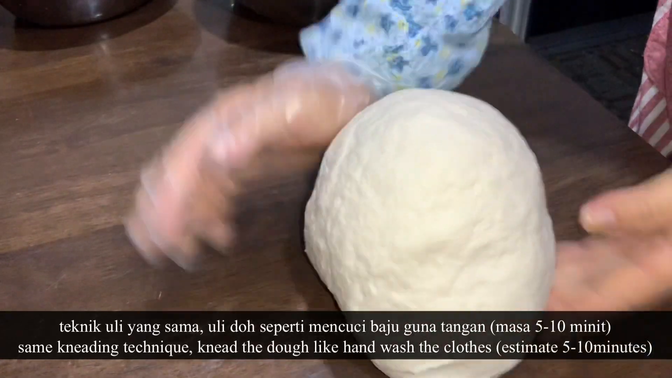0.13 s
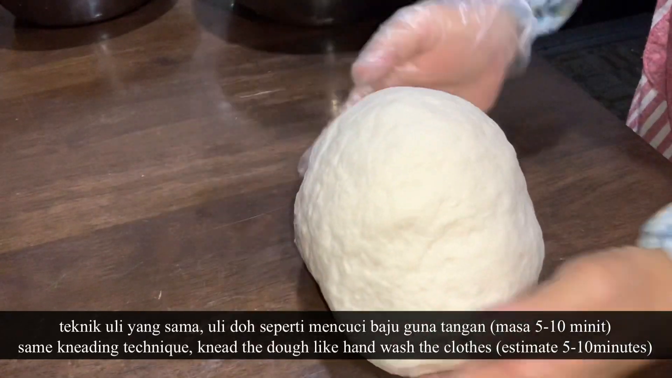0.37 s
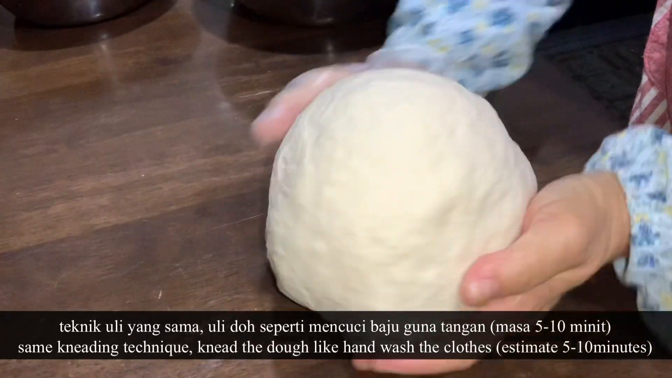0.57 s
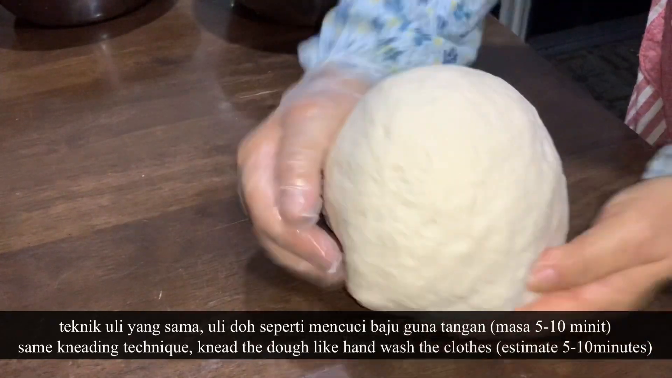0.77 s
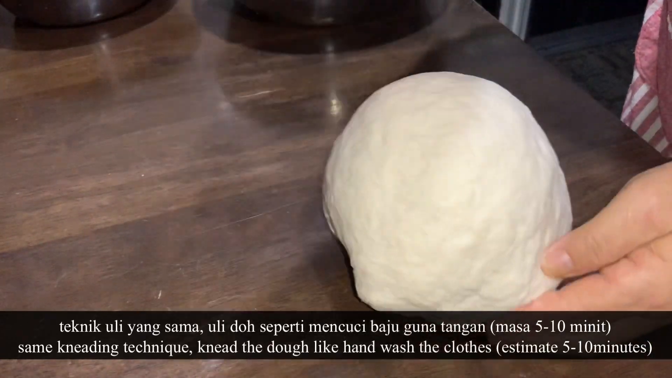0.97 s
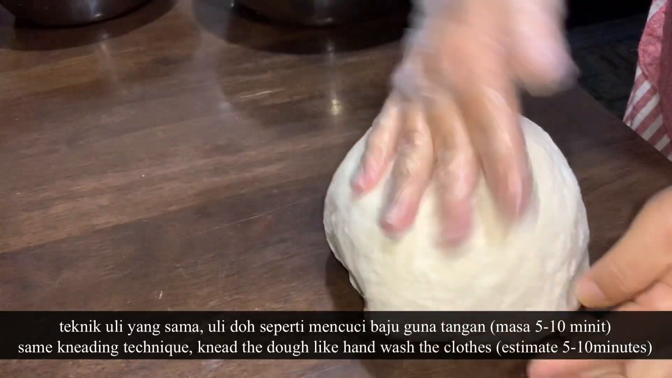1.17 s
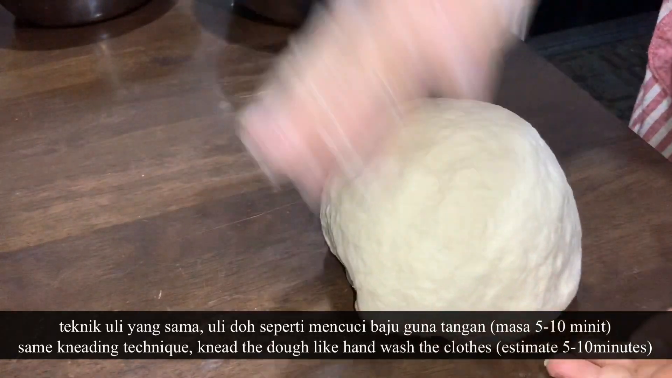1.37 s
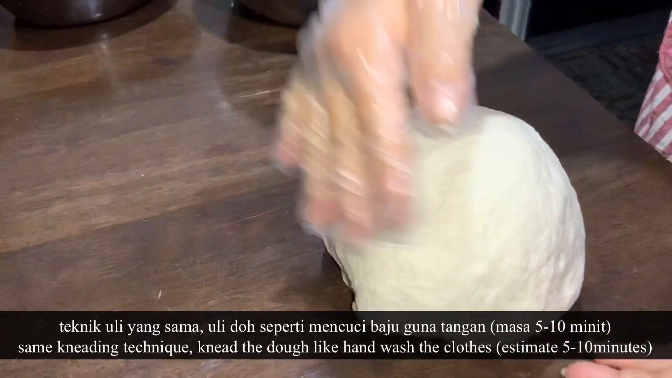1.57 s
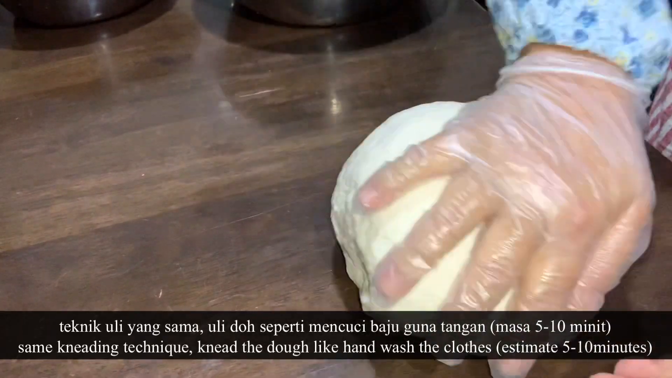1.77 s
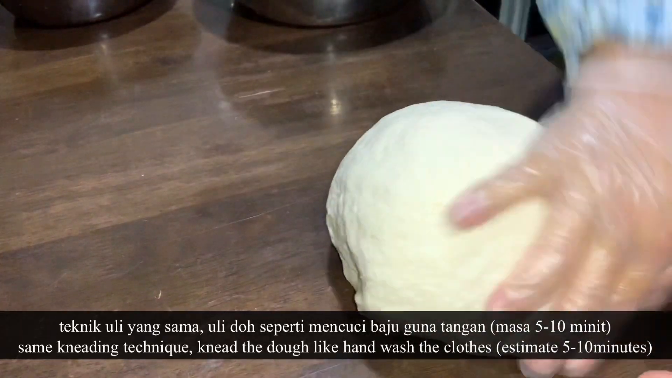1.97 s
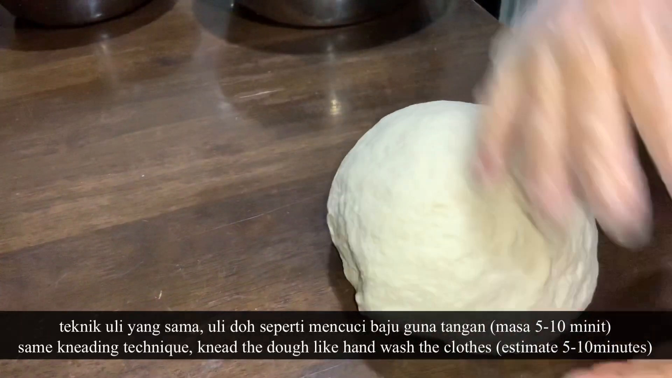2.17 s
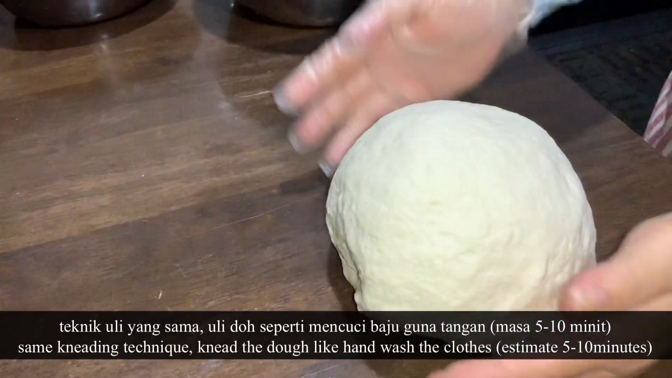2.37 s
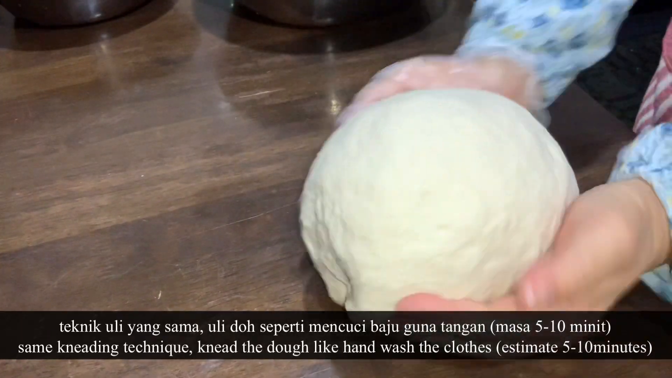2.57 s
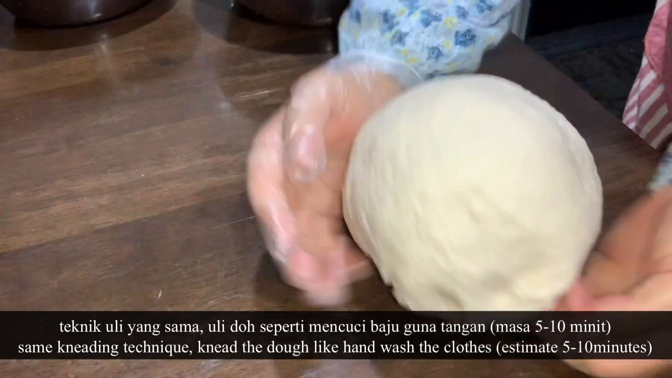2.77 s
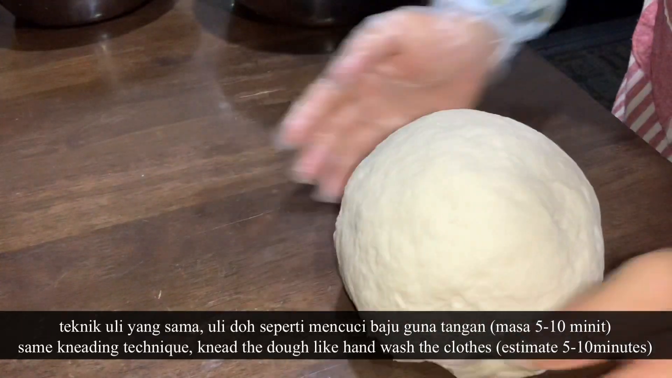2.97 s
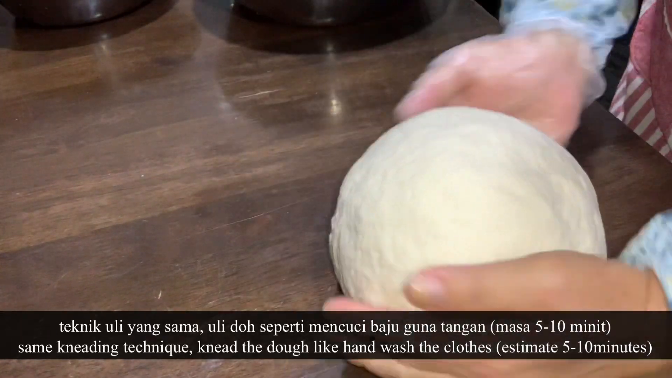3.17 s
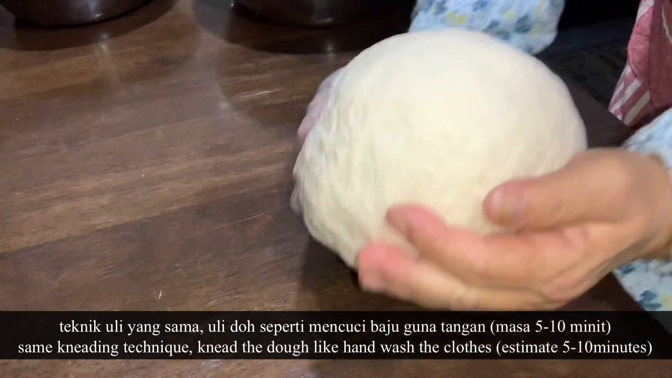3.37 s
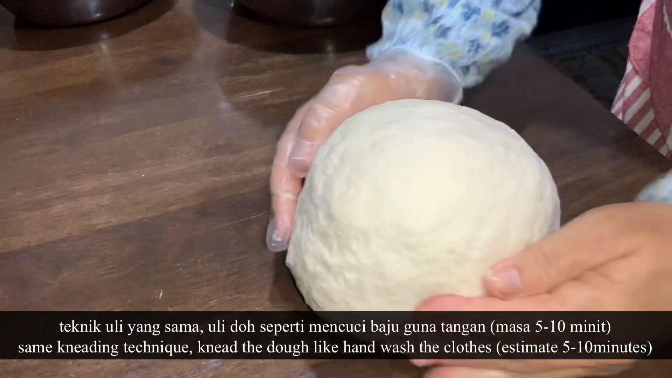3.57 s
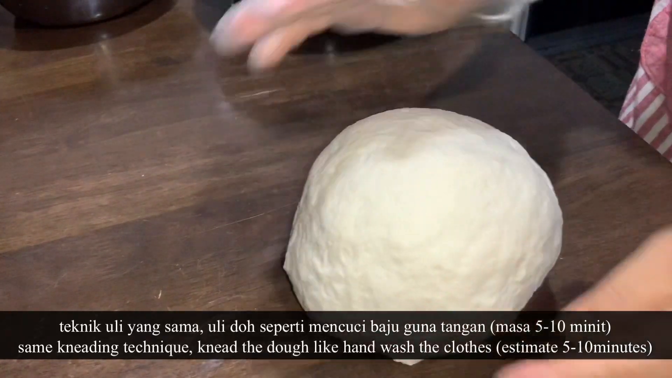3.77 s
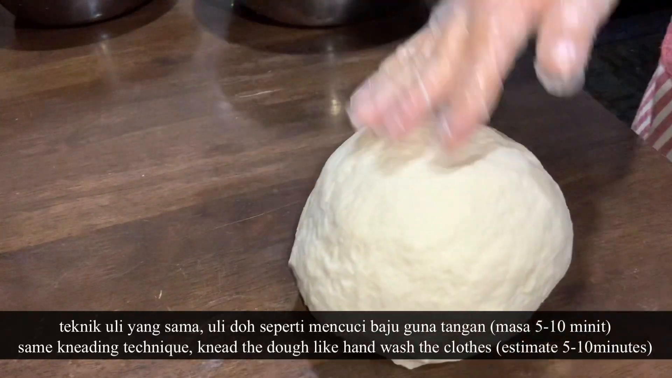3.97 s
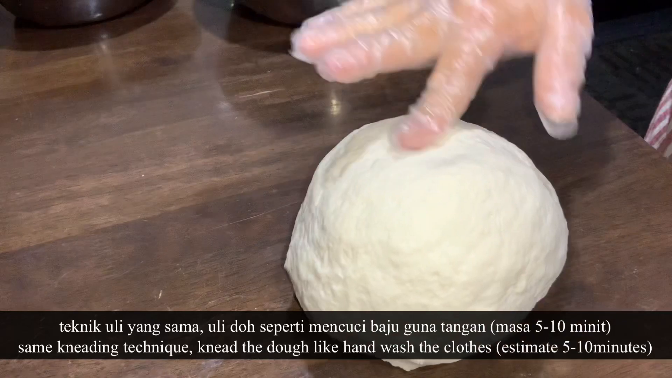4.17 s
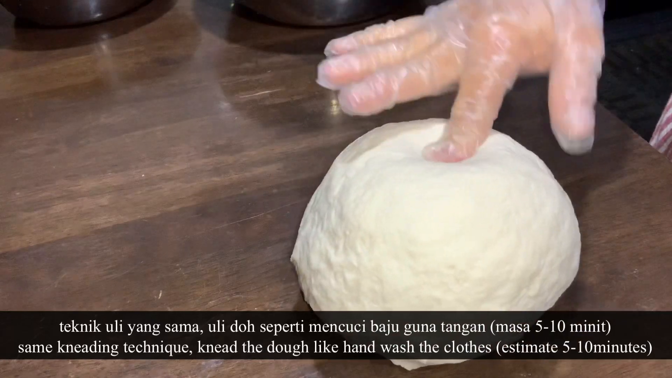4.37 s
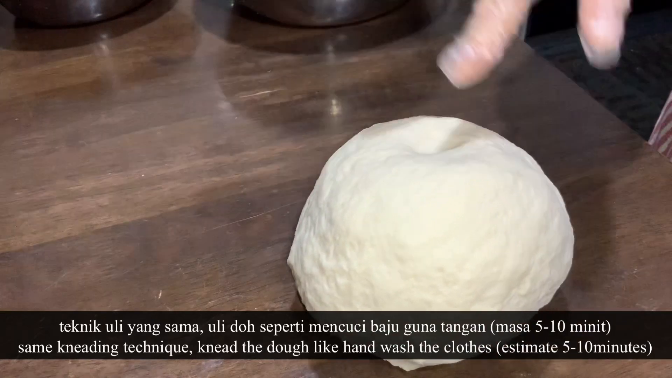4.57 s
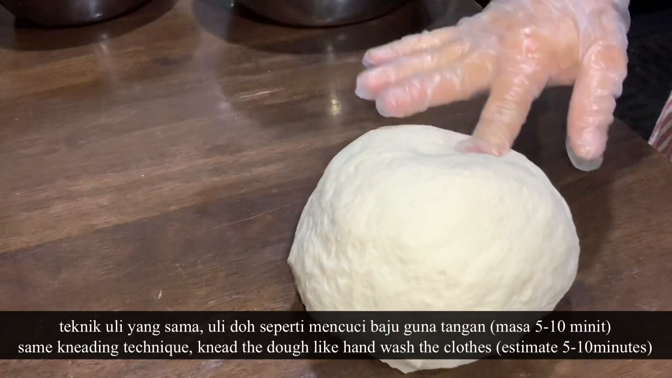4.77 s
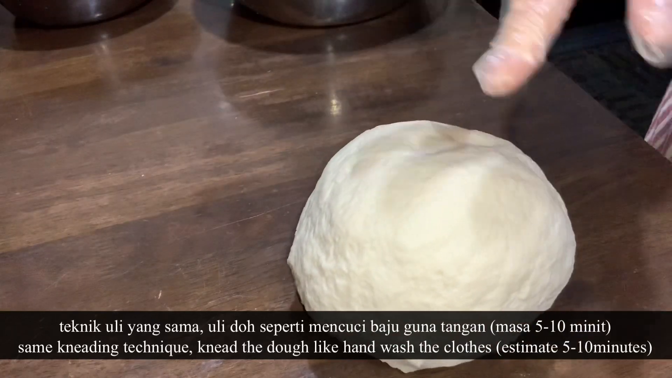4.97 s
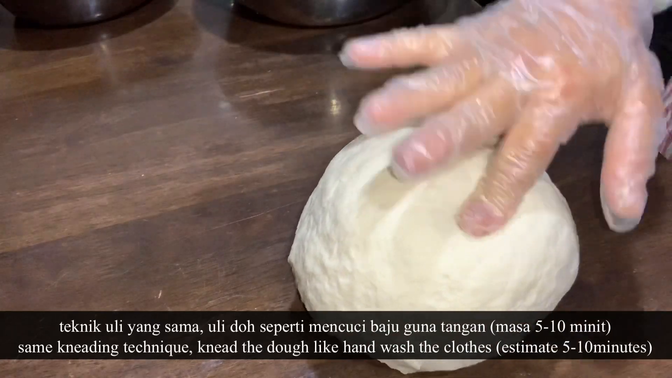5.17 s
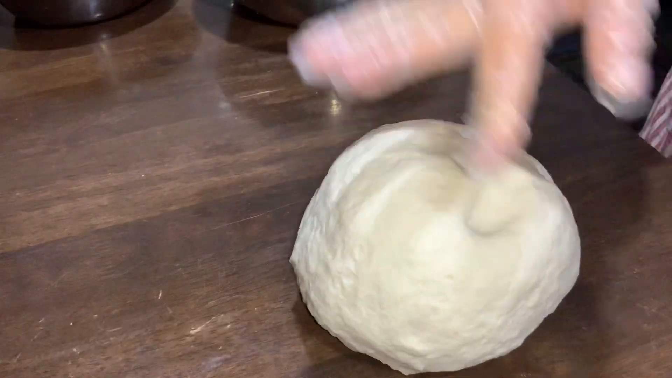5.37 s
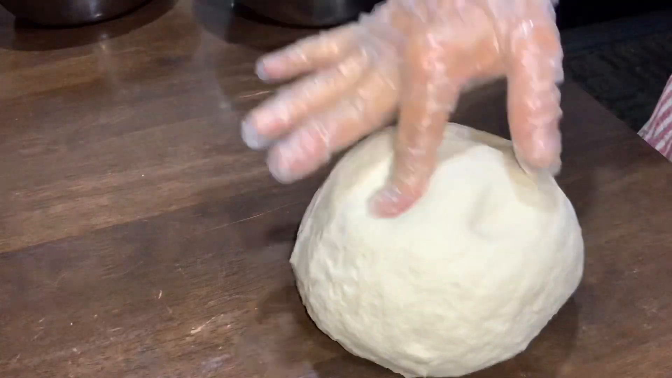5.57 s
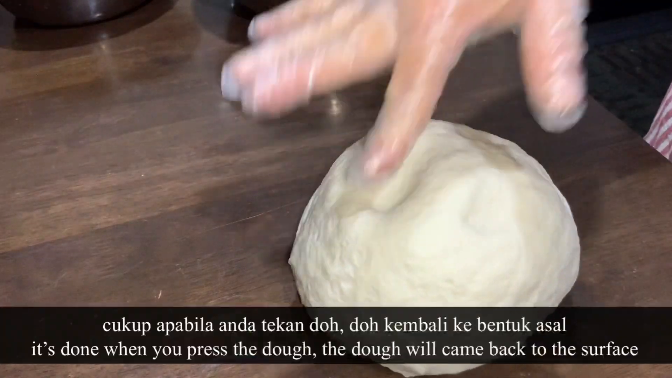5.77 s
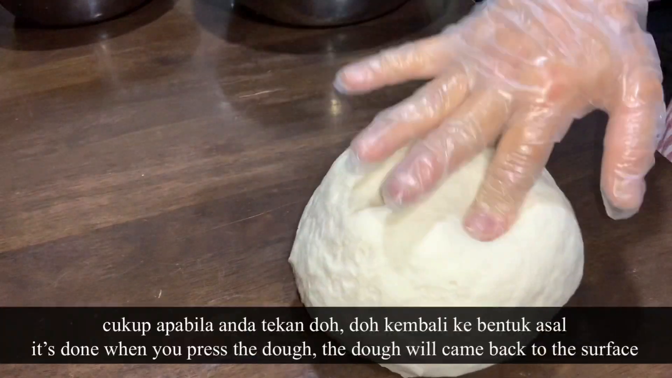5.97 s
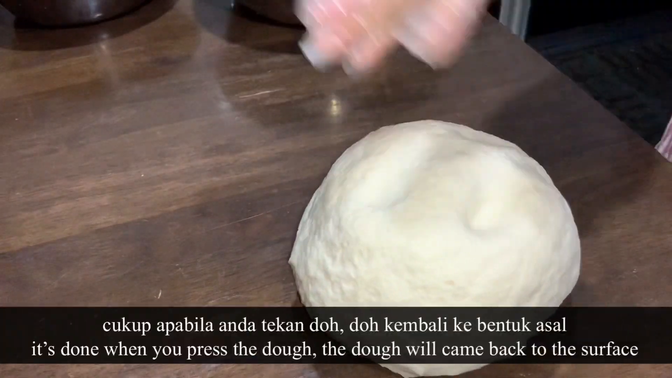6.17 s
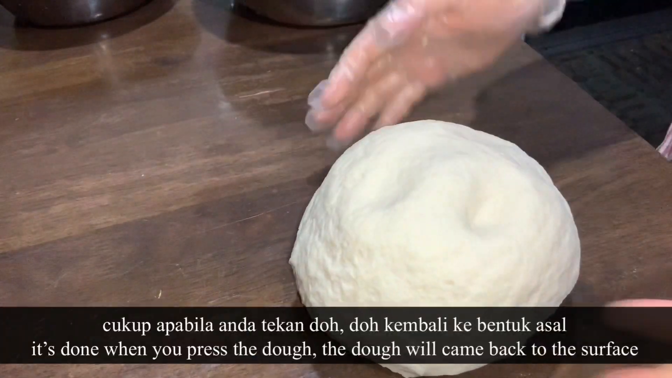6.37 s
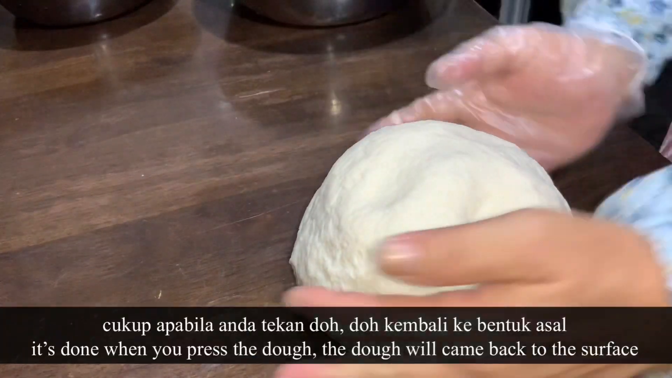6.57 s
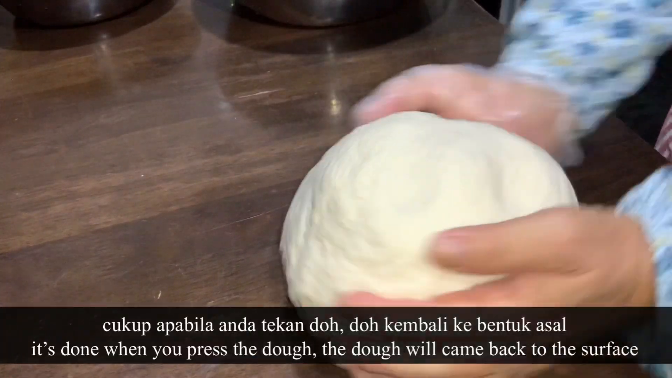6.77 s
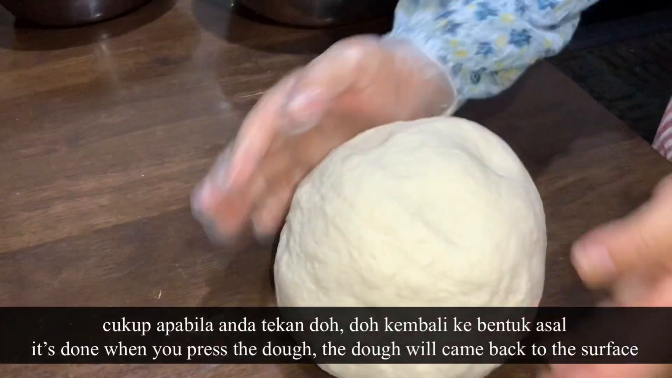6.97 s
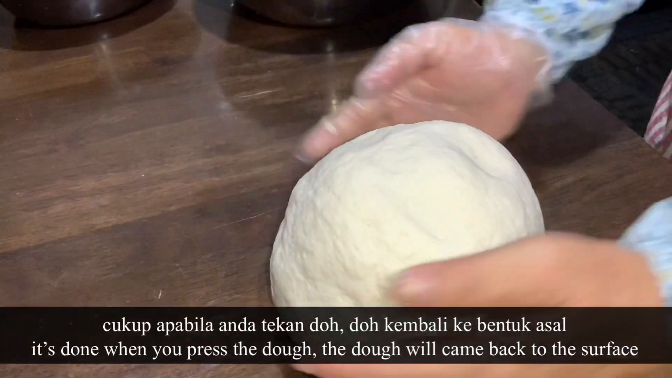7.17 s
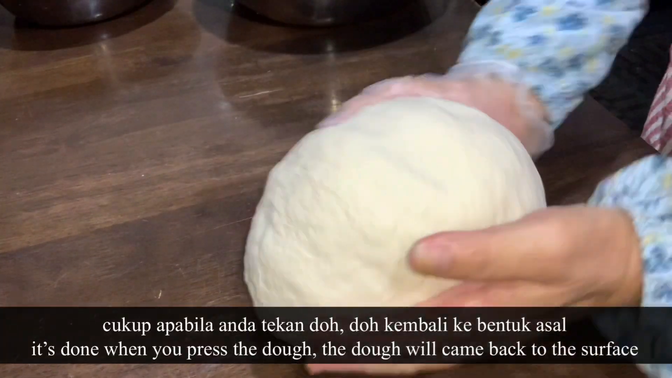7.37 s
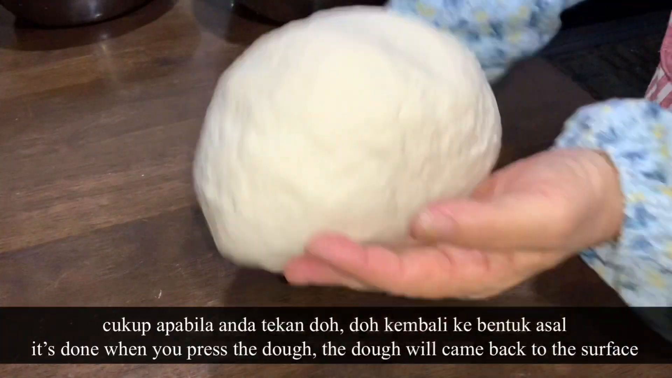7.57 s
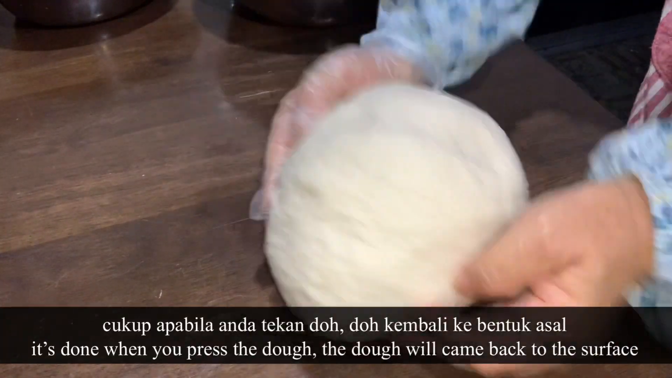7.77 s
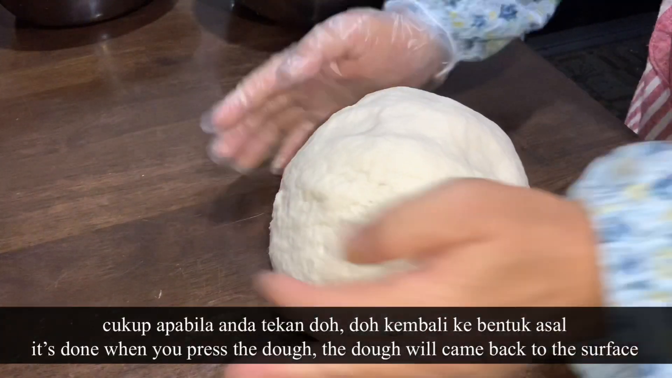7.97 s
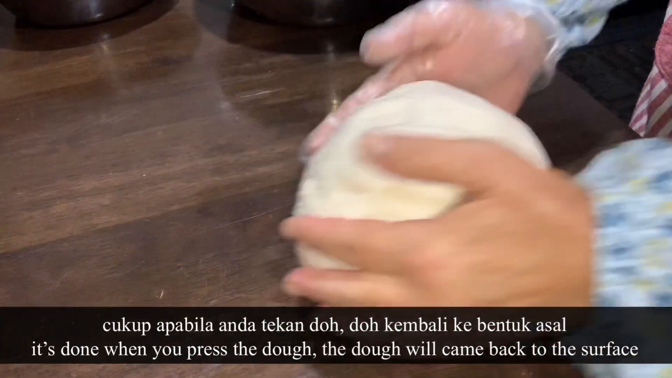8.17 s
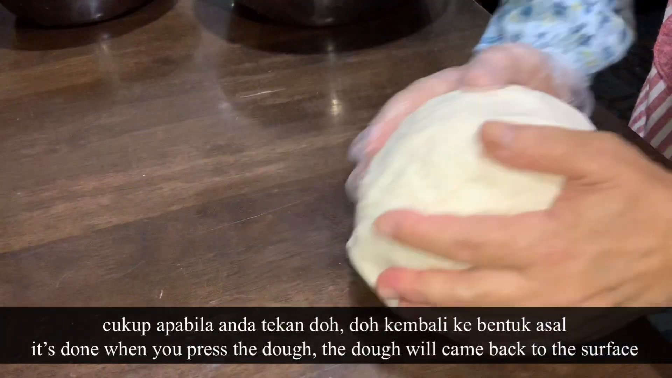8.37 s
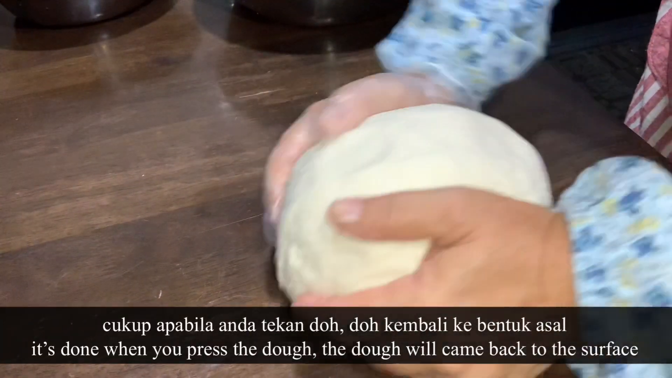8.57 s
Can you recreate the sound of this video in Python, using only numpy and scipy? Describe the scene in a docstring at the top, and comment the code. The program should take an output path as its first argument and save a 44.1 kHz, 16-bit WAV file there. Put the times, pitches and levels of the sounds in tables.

```python
"""Kneading dough in plastic gloves

Hands in thin plastic gloves slap, turn, poke and drop a ball of dough on a wooden table.
Shaped noise makes the film rustle and snap and the trapped air spit; fading sine waves make pops and thumps.
Random echoes add a small kitchen, over a low household rumble with a faint late whine.
The microphones are close, so the hardest slaps clip."""
import sys
import numpy as np
from scipy import signal
from scipy.fft import rfft, irfft, next_fast_len
from scipy.io import wavfile
from scipy.ndimage import uniform_filter1d, map_coordinates

SR = 44100
rng = np.random.default_rng(int(sys.argv[2]) if len(sys.argv) > 2 else 0)


def log_audio(samples):
    """Write samples as a 16-bit WAV file to the path given in sys.argv[1]."""
    # one column per channel
    frames = np.atleast_2d(samples).T
    # limit to full scale, then quantise
    limited = np.clip(frames, -1, 1)
    pcm = np.round(limited * 32767).astype(np.int16)
    wavfile.write(sys.argv[1], SR, pcm)


N = 380141
T = np.arange(SR // 2) / SR  # time within one contact, in seconds


def amp(db):
    """Turn decibels into a gain."""
    return 10 ** (np.asarray(db) / 20)


def unit(x):
    """Scale x to an average (rms) level of 1."""
    return x / np.sqrt(np.mean(x ** 2) + 1e-20)


def along(points, hz):
    """Read a curve of (Hz, value) points, with frequency on a log axis."""
    f, v = np.transpose(points)
    return np.interp(np.log(hz + 1), np.log(f), v)


def filtered(x, response):
    """Shape x by a gain that depends on frequency."""
    n = x.shape[-1]
    m = next_fast_len(n + 8192)
    spectrum = rfft(x, m) * response(np.fft.rfftfreq(m, 1 / SR))
    return irfft(spectrum, m)[..., :n]


def noise(spectrum, shape):
    """Coloured noise of rms 1."""
    return unit(filtered(rng.standard_normal(shape), lambda hz: amp(along(spectrum, hz))))


def resonance(hz, centre, width):
    """Response of one damped resonance: strongest at its centre, weaker to either side."""
    return 1j * hz * width / (centre ** 2 - hz ** 2 + 1j * hz * width)


def wobble(rate):
    """A smooth random curve with this many random knots a second."""
    knots = rng.standard_normal(int(N * rate / SR) + 4)
    return map_coordinates(knots, [np.arange(N) * rate / SR])


def add(track, s, sound):
    """Mix a sound into the track from time s in seconds."""
    i = round(s * SR)
    first, last = np.clip([i, i + len(sound)], 0, N)
    track[first:last] += sound[first - i:last - i]


def ring(hz, t60, attack):
    """A sine with a soft start that fades by 60 dB in t60 seconds."""
    return np.sin(2 * np.pi * hz * T) * amp(-60 * T / t60) * (1 - np.exp(-T / attack))


def glide(x, speed):
    """Play x at a changing speed, so its pitch moves too."""
    return map_coordinates(x, [np.cumsum(speed)])


def burst(envelope, response):
    """Dense noise under an envelope, filling the response evenly."""
    hz = np.fft.rfftfreq(len(envelope), 1 / SR)
    # keep only the noise's random phases, so the response alone sets the colour
    phase = np.angle(rfft(envelope * rng.standard_normal(len(envelope))))
    sound = irfft(np.exp(1j * phase) * response(hz), len(envelope)) * envelope ** 0.52
    return unit(sound) * np.sqrt(np.mean(envelope ** 2))


def add_spit(track, s, db, ms, response, lead_share, lead_ms, crackle_db):
    """Air squeezed from a closing gap, centred on s: a quick rise and a slower, crackling fall."""
    t = T - T.mean()
    u = t / (ms / 1000)
    lead = np.exp(-abs(t) / (lead_ms / 1000))
    rise = (1 - lead_share) * np.exp(-(1.365 * abs(u)) ** 3) + lead_share * lead
    fall = (1 + u ** 2) ** -2
    bell = np.where(u < 0, rise, fall)
    flicker = unit(uniform_filter1d(rng.standard_normal(len(T)), size=50))
    crackle = unit(amp(crackle_db * flicker))
    add(track, s - T.mean(), amp(db) * burst(bell * crackle, response))


# Colour of the household background. Each row: frequency in Hz, level in dB per Hz.
BACKGROUND_COLOUR = [(25, -11), (60, -10), (118, -1), (170, -8.5), (260, -11.5), (450, -20), (900, -24.5),
                     (1500, -34.5), (3000, -42.5), (6000, -39.5), (10000, -48.5), (16000, -36)]


def room_tone():
    """A low, steady household rumble with a trace of hiss; a faint whine of narrow noise sets in near the end."""
    t = np.arange(N) / SR
    mid, side = noise(BACKGROUND_COLOUR, (2, N))
    # less difference between left and right in the bass
    side = filtered(side, lambda hz: amp(along([(120, -10.5), (250, -6), (600, -0.5)], hz)))
    rumble = np.array([mid + side, mid - side])
    whine = unit(filtered(rng.standard_normal((2, N)), lambda hz: resonance(hz, 1793.0, 119.9) ** 2))
    whine_fade = np.clip((t - 7.2) / 0.5, 0, 1)
    return amp(-48.5) * rumble + amp(-60.0) * whine * whine_fade


# Notes of the wooden tabletop. Each row: frequency in Hz, level in dB, time to fade by 60 dB in seconds.
TABLETOP_MODES = [(41.5, -9, 0.27), (82, -1.5, 0.13), (124.6, -3, 0.2), (173, -2.5, 0.25),
                  (211.6, -3, 0.28), (258, 0, 0.19), (354, -6, 0.14), (491, -5, 0.21)]


def tabletop():
    """The wood rings in several notes, with new strengths and slightly new pitches under each soft blow."""
    out = np.zeros(len(T))
    for hz, db, t60 in TABLETOP_MODES:
        strength = amp(db + rng.normal(0, 3)) * rng.choice([-1, 1])
        out += strength * ring(hz * (1 + rng.normal(0, 0.025)), t60, attack=0.0019)
    return out


# Dough lands on the wood or is patted. Each row: start in seconds, smack level in dB, smack pitch in Hz,
# time for the smack to fade by 60 dB in seconds, tabletop level in dB.
PATS = [(0.024, -35, 860, 0.079, -42.5), (0.5443, -29.5, 800, 0.053, -46.5), (0.637, -31, 950, 0.044, -47),
        (1.793, -23, 1150, 0.094, -54), (1.893, -22, 1720, 0.042, -49), (1.995, -19.5, 970, 0.11, -29.5),
        (2.233, -34.5, 610, 0.13, -57), (2.490, -24, 1270, 0.046, -51), (2.543, -27.5, 1100, 0.035, -53),
        (2.6242, -23, 1560, 0.021, -47), (2.7935, -22, 1550, 0.059, -40.5),
        (3.158, -32.5, 1400, 0.041, -44), (3.178, -27.5, 1700, 0.028, -47.5), (3.263, -36, 900, 0.075, -48),
        (3.4307, -14, 1120, 0.044, -26.5), (3.574, -35, 890, 0.13, -56), (4.752, -45, 820, 0.13, -61),
        (6.641, -30.5, 1030, 0.093, -65), (6.774, -25.5, 1300, 0.035, -56),
        (7.282, -29, 1700, 0.023, -50.5), (7.297, -34.5, 1038, 0.29, -65), (7.767, -21.5, 960, .1, -27.5),
        (8.175, -29, 1050, 0.11, -42)]
SMACK_SAG, SMACK_SAG_S = 0.3, 0.014  # the pitch sinks by this share as the contact spreads
SMACK_DULL_HZ = 420  # smacks as low as this lose all their top
TICK_ABOVE, TICK_DB, TICK_T60_S = 3, -1.5, 0.016  # first touch: pitch over the smack's, level before dulling


def pats():
    """Soft dough meets wood or hand: a crisp tick and a hollow smack that sinks in pitch; the lower, the duller."""
    out = np.zeros(N)
    sag = 1 - SMACK_SAG * (1 - np.exp(-T / SMACK_SAG_S))
    for s, db, centre, t60, wood_db in PATS:
        top_hz, tick_hz = centre ** 2 / SMACK_DULL_HZ, TICK_ABOVE * centre
        hollow = lambda hz: resonance(hz, centre, centre) / (1 + (hz / top_hz) ** 3)
        smack_envelope = amp(-60 * T / t60) * (1 - np.exp(-T / 0.001))
        smack = glide(burst(smack_envelope, hollow), sag)
        tick_envelope = amp(TICK_DB - 60 * T / TICK_T60_S)
        tick = burst(tick_envelope, lambda hz: resonance(hz, tick_hz, tick_hz))
        tick_dulling = min(top_hz / tick_hz, 1) ** 2
        add(out, s, amp(db) * (smack + tick_dulling * tick) + amp(wood_db) * tabletop())
    return out


def crinkle(spectrum, rate, share):
    """Friction noise of rms 1: a smooth rush with clumps of tiny slips, rate of them a second."""
    slips = (rng.random(N) < rate / SR) * rng.standard_normal(N) * amp(3.5 * wobble(120))
    drive = np.sqrt(share) * unit(slips) + np.sqrt(1 - share) * rng.standard_normal(N)
    return unit(filtered(drive, lambda hz: amp(along(spectrum, hz))))


# The hands stroke, cup and turn the ball. Each row: first touch in seconds, firmest squeeze in seconds
# (if later than letting go, the rub is cut off while still growing), letting go in seconds,
# film hiss level in dB before the skim, dough rub level in dB at the firmest squeeze.
TURNS = [(0.027, 0.078, .17, -38.5, -38), (0.303, 0.435, 0.53, -46.5, -47),
         (0.585, 0.753, 0.93, -44.5, -43.5), (2.401, 2.49, 2.8, -39, -45),
         (2.916, 3.234, 3.295, -42.5, -47), (3.34, 3.5, 3.71, -52, -44), (4.831, 4.885, 4.91, -45.5, -51.5),
         (5.529, 5.57, 5.8, -60.5, -65), (6.076, 6.176, 6.24, -63.5, -51.5), (6.337, 6.43, 6.5, -68, -55),
         (6.469, 6.71, 6.74, -45.5, -45.5), (6.716, 6.96, 6.85, -39.5, -39), (7.1, 7.3, 7.48, -40.5, -43),
         (7.695, 7.78, 7.9, -45, -43), (7.987, 8.138, 8.24, -43, -47), (8.378, 8.66, 8.48, -51.5, -41)]
# Colours of the film's hiss and the dough's rub. Each row: frequency in Hz, level in dB per Hz.
HISS_COLOUR = [(200, -29), (3000, -26), (7500, -14), (11000, -3.5), (13500, 0), (16000, -9.5)]
RUB_COLOUR = [(80, -4), (1000, -4), (2200, 0), (4500, -2.5), (7500, -6), (16000, -21.5)]
# the slide that follows every row of SLAPS, timed from its crack
SLIDE_START_S, SLIDE_PRESS_S, SLIDE_END_S, SLIDE_HISS_DB = 0.04, 0.12, 0.17, -41
SKIM_S, SKIM_DB = 0.092, 3  # the glove first skims in quickly and hisses more, most at this time
RUB_SWELL_DB = 17.5  # growth from a light touch to full pressure
SLEEVE_DB, SLEEVE_S = -13, 0.49  # a faint rustle goes with the hands' motion, spread over this time


def strokes():
    """Sliding hands: the film hisses from first touch, the dough's skin rubs louder as the pressure swells."""
    t = np.arange(N) / SR
    hiss, rub = np.zeros((2, N))
    slides = [(s + SLIDE_START_S, s + SLIDE_PRESS_S, s + SLIDE_END_S, SLIDE_HISS_DB, rub_db)
              for s, *_, rub_db in SLAPS]
    for start, squeeze, end, hiss_db, rub_db in TURNS + slides:
        since = t[:max(round((end - start) * SR), 2)]
        contact = np.clip(since / 0.0078, 0, 1) * np.clip((since[-1] - since) / 0.035, 0, 1)
        slack = np.interp(start + since, [start, squeeze, end], [1, 0, 1]) ** 2
        skim = since / SKIM_S * np.exp(1 - since / SKIM_S)
        add(hiss, start, amp(hiss_db + SKIM_DB * skim) * contact)
        add(rub, start, amp(rub_db - RUB_SWELL_DB * slack) * contact)
    hiss, rub = [level + amp(SLEEVE_DB) * uniform_filter1d(level, round(SLEEVE_S * SR))
                 for level in (hiss, rub)]
    grip = amp(3.13 * wobble(30) + wobble(120))  # the film catches and lets go
    film = hiss * crinkle(HISS_COLOUR, rate=450, share=0.64)
    skin = rub * crinkle(RUB_COLOUR, rate=330, share=0.7)
    return grip * (film + skin)


# The glove brushes hard over the dough. Each row: centre in seconds, level in dB, length in ms.
DABS = [(0.097, -20.5, 2.3), (0.7473, -25.5, 2), (0.78, -19.5, 13.3), (2.757, -21.5, 10), (4.66, -49, 3.54),
        (6.967, -26.5, 39), (7.774, -26.5, 26)]
# Colour of a brush. Each row: frequency in Hz, level in dB per Hz.
DAB_COLOUR = [(100, -13), (700, -9), (1400, -8.5), (3500, -5.5), (8000, -8.5), (13000, 1), (16000, -6)]
# A finger tests the dough. Each row: press in seconds, pull out in seconds, pull length in seconds,
# press level in dB, pull level in dB.
POKES = [(4.168, 4.43, 0.016, -40, -29.5), (5.0895, 5.325, 0.017, -38, -32.5),
         (5.519, 5.735, 0.0315, -38.5, -31), (5.9, 6.073, 0.0056, -32.5, -27.5)]
PRESS_MS = 4.7  # the fingertip lands with a tick
STRETCH_DB, STRETCH_MS = -13.5, 16.7  # hiss of the stretching film, level relative to the pull


def gloves():
    """Light dabs of the film: hard brushes, fingertip pokes and the stretch before a finger comes free."""
    out = np.zeros(N)
    presses = [(s, db, PRESS_MS) for s, _, _, db, _ in POKES]
    stretches = [(s, db + STRETCH_DB, STRETCH_MS) for _, s, _, _, db in POKES]
    colour = lambda hz: amp(along(DAB_COLOUR, hz))
    for s, db, ms in DABS + presses + stretches:
        add_spit(out, s, db, ms, colour, lead_share=0.55, lead_ms=2.1 * ms, crackle_db=3.0)
    return out


# The ball's weight settles on the table in one soft push. Each row: start in seconds, level in dB, pitch in Hz.
BUMPS = [(0.12, -29, 100), (0.362, -33.5, 99), (.641, -26, 84), (1.419, -21.5, 79), (1.732, -22.5, 77.5),
         (1.99, -19, 80), (3.166, -29.5, 87), (3.445, -24.5, 100), (7.77, -20, 80)]
BUMP_CYCLES = 0.66  # cycles until the push is strongest


def bumps():
    """The soft, heavy ball pushes the table through a cycle or two of a low sine."""
    out = np.zeros(N)
    for s, db, hz in BUMPS:
        u = T * hz / BUMP_CYCLES
        add(out, s, -amp(db) * np.sin(2 * np.pi * hz * T) * (u * np.exp(1 - u)) ** 2)
    return out


# The glove film snaps taut. Each row: start in seconds, level in dB before a 12 dB lift, pitch of its ping in Hz.
SNAPS = [(0.1937, -10.5, 14350), (0.327, -10, 13300), (3.3579, -12.5, 13850), (3.5043, -10.5, 13250)]
# Resonances of the taut film. Each row: frequency in Hz, width in Hz, level in dB.
FILM_RESONANCES = [(2560, 570, -14), (6890, 900, -6), (8800, 600, -8.5), (14900, 650, -8)]
PING_WIDTH_HZ, PING_DB = 480, 7  # the ping, louder than the other resonances


def snaps():
    """The film snaps taut and rings for a few milliseconds; its tension sets the ping."""
    out = np.zeros(N)
    envelope = amp(-60 * T / 0.012) * (1 - np.exp(-T / 0.0016))
    for s, db, ping_hz in SNAPS:
        resonances = FILM_RESONANCES + [(ping_hz, PING_WIDTH_HZ, PING_DB)]
        film = lambda hz: np.sqrt(sum(abs(amp(level) * resonance(hz, centre, width)) ** 2
                                      for centre, width, level in resonances))
        add(out, s, amp(db + 12.0) * burst(envelope, film))
    return out


# The palm hits the dough, or the dropped ball lands (3.43 s). Each row: centre of the crack in seconds,
# crack level in dB, crack length in ms, thump level in dB, thump pitch in Hz, tabletop level in dB,
# rub level in dB as the hand slides off.
SLAPS = [(1.0714, 3, 2.9, -0.5, 220, -29.5, -39.5), (1.4075, 1.5, 6.36, -18, 262, -25.5, -35.5),
         (1.7183, -1, 7.3, -4, 190, -27, -41), (1.983, -6.5, 9.5, -17.5, 333, -26, -42),
         (3.4321, -24, 4.7, -11, 178, -24.5, -66), (3.8526, -8, 3.1, -15, 202, -49, -49.5)]
# Colour of the crack. Each row: frequency in Hz, level in dB per Hz.
CRACK_COLOUR = [(100, -2.5), (600, -1.5), (1300, -6), (2300, -4), (8500, -6), (13000, 1.5), (16000, -1)]
GAP_HZ, GAP_FALL_PER_MS = 6640, 0.12  # closing air gap: a slower slap sounds lower
THUMP_SAG, THUMP_SAG_S = 1.1, 0.0025  # the thump starts higher by this share and sinks as the dough gives


def slaps():
    """Air spits through the gap under the palm or ball, then the dough thumps and pushes the table."""
    out = np.zeros(N)
    sag = 1 + THUMP_SAG * np.exp(-T / THUMP_SAG_S)
    for s, crack_db, ms, thump_db, thump_hz, wood_db, _ in SLAPS:
        gap_hz = GAP_HZ * np.exp(-GAP_FALL_PER_MS * ms)
        gap = lambda hz: amp(along(CRACK_COLOUR, hz)) * (1 + 1.4 * abs(resonance(hz, gap_hz, 0.36 * gap_hz)))
        add_spit(out, s, crack_db, ms, gap, lead_share=0.1, lead_ms=3.6, crackle_db=3.0)
        landed = s + ms / 2000  # half a crack length later
        thump = glide(ring(thump_hz, t60=0.034, attack=0.0022), sag)
        add(out, landed, -amp(thump_db) * thump + amp(wood_db) * tabletop())
    return out


# The glove drags over the dough in tiny slips. Each row: start in seconds, length in seconds, level in dB,
# pitch at the start in Hz, pitch at the end in Hz.
SCUFFS = [(1.503, 0.044, -33.5, 2225, 2143), (1.888, 0.055, -36, 2715, 1806),
          (6.93, 0.057, -36.5, 3170, 3264), (8.108, 0.026, -40, 2220, 2130)]
SLIPS_PER_S, SCUFF_WIDTH = 830, 0.11  # width as a share of the starting pitch
SCUFF_UPPER, SCUFF_UPPER_DB = 1.45, -7.5  # second resonance: pitch and level relative to the first


def scuffs():
    """Uneven slips ring two resonances of the film, which move as its tension changes."""
    out = np.zeros(N)
    for s, length, db, start_hz, end_hz in SCUFFS:
        u = np.clip(T / length, 0, 1)
        slips = (rng.random(len(T)) < SLIPS_PER_S / SR) * rng.standard_normal(len(T))
        width, upper_hz = SCUFF_WIDTH * start_hz, SCUFF_UPPER * start_hz
        film = lambda hz: resonance(hz, start_hz, width) - amp(SCUFF_UPPER_DB) * resonance(hz, upper_hz, width)
        drag = glide(unit(filtered(slips, film)), (end_hz / start_hz) ** u)
        add(out, s, amp(db) * np.sqrt(abs(np.sin(np.pi * u))) * drag)
    return out


PEEL_GAP_S, PEEL_TICK_MS = 0.0055, 2.65  # the finger comes free in a run of sharp snaps
PEEL_DULLING_DB = 1.32  # darker tilt reached over the whole pull, in dB per octave in the treble


def peels():
    """The fingertip unsticks in separate snaps, which darken as the gap opens."""
    out = np.zeros(N)
    for _, s, length, _, db in POKES:
        for since in np.arange(0, length, PEEL_GAP_S):
            tilt_db = PEEL_DULLING_DB * since / length
            colour = lambda hz: amp(along(DAB_COLOUR, hz) - tilt_db * np.log2(1 + hz / 1000))
            late, size_db = rng.normal(0, [PEEL_GAP_S / 10, 2])  # uneven timing and strength
            add_spit(out, s + since + late, db + size_db, PEEL_TICK_MS, colour,
                     lead_share=0.15, lead_ms=2 * PEEL_TICK_MS, crackle_db=2)
    return out


# Air pops out of a cupped hand or from under the ball.
# Each row: start in seconds, level in dB before an 8 dB lift, pitch in Hz.
POPS = [(6.544, -14.5, 337.5), (6.579, -26, 320), (6.737, -18.5, 333), (7.153, -31, 336), (7.768, -21, 335),
        (8.225, -31.5, 338), (8.317, -30.5, 328)]


def pops():
    """Air cupped between palm and dough rings briefly at one pitch, with a faint higher partner."""
    out = np.zeros(N)
    for s, db, hz in POPS:
        low = ring(hz, t60=0.038, attack=0.0057)
        high = ring(2.5 * hz, t60=0.056, attack=0.0027)
        add(out, s, amp(db + 8.0) * (low + 0.075 * high))
    return out


# Balance of the two microphones. Each row: frequency in Hz, level of left over right in dB.
LEFT_LEAN = [(150, 3.5), (1200, 3), (2000, -5), (4000, 0)]
PORT_LAG = 27  # samples by which the left microphone hears the treble later


def microphones(x):
    """The left port hears the treble later; the bass arrives in step and leans left, the upper middle leans right."""
    lag = lambda hz: PORT_LAG / SR * (1 - np.exp(-np.maximum(hz - 950, 0) / 500))
    late = lambda hz: np.exp(-2j * np.pi * hz * lag(hz))
    lean = lambda hz: amp(along(LEFT_LEAN, hz) / 2)
    left = filtered(x, lambda hz: late(hz) * lean(hz))
    right = filtered(x, lambda hz: 1 / lean(hz))
    return np.array([left, right])


# How long the kitchen echoes. Each row: frequency in Hz, time to fade by 60 dB in seconds.
KITCHEN_FADE = [(100, 0.32), (300, 0.65), (1200, 0.4), (5000, 0.42), (13000, 0.28)]


def room_tail():
    """A diffuse tail of fading noise, unrelated between the ports except in the bass."""
    hz, t, z = signal.stft(rng.standard_normal((2, SR // 2)), SR, nperseg=256)
    z[1] *= np.clip(hz / 700, 0.3, 1)[:, None]  # less left-right difference in the bass
    fade = amp(-60 * t / along(KITCHEN_FADE, hz)[:, None])
    mid, side = signal.istft(z * fade, SR, nperseg=256)[1]
    onset = 1 - np.exp(-np.arange(len(mid)) / SR / 0.000084)
    tail = np.array([mid + side, mid - side]) * onset
    return tail / np.linalg.norm(tail[0])


# What the walls send back. Each row: frequency in Hz, reflected level in dB.
WALL_COLOUR = [(3000, 0.45), (8000, 2), (15000, -5)]


def kitchen(x, size=SR // 3):
    """The walls answer with a diffuse echo, drawn anew every third of a second."""
    out = np.zeros((2, N + SR))
    for i in range(0, N, size):
        answer = signal.fftconvolve(x[None, i:i + size], room_tail(), axes=1)
        out[:, i:i + answer.shape[1]] += answer
    return filtered(out[:, :N], lambda hz: amp(along(WALL_COLOUR, hz)))


def scene():
    """Hands and dough close by, the kitchen around them."""
    background = room_tone()
    pat = pats() + bumps()
    slide = strokes()
    glove = gloves() + peels() + scuffs()
    snap, slap, pop = snaps(), slaps(), pops()
    direct = microphones(pat + slide + glove + snap + slap + pop)
    to_room = amp(-3.0) * (pat + pop) + amp(-1.0) * slide + amp(-6.0) * glove
    to_room += amp(-7.5) * snap + amp(-9.5) * slap
    return direct + kitchen(to_room) + background


TOP_HZ = 15900  # upper band limit


def record(dry):
    """The input clips at full scale, then a steep filter removes what lies above its band limit."""
    clipped = np.clip(dry, -1, 1)
    return filtered(clipped, lambda hz: 1 / np.sqrt(1 + (hz / TOP_HZ) ** 160))


dry = scene()
out = record(dry)
log_audio(out)
```